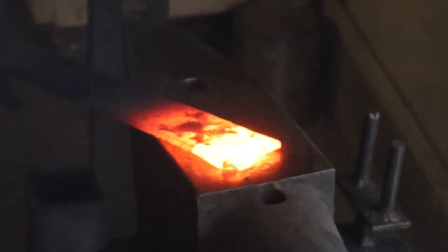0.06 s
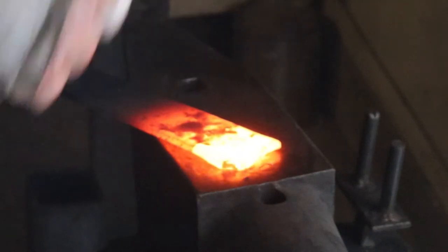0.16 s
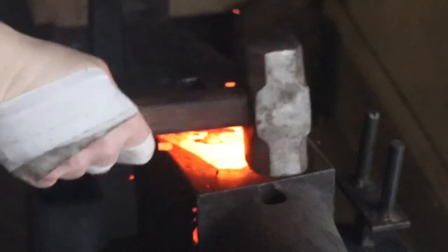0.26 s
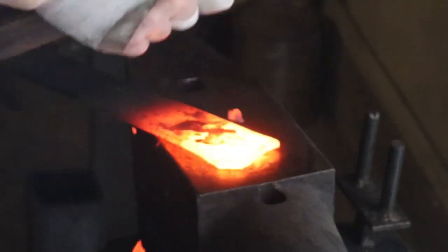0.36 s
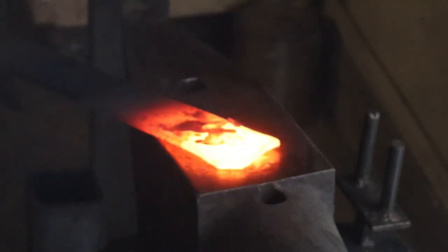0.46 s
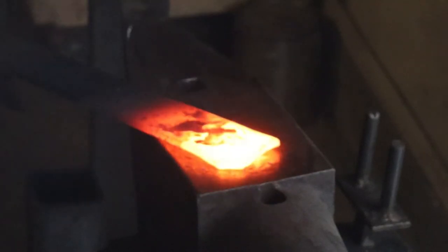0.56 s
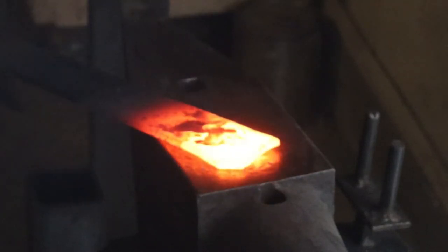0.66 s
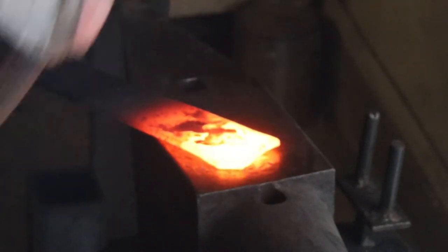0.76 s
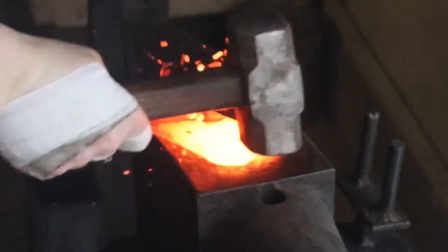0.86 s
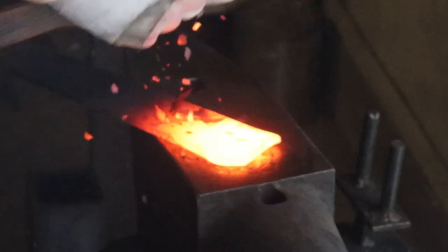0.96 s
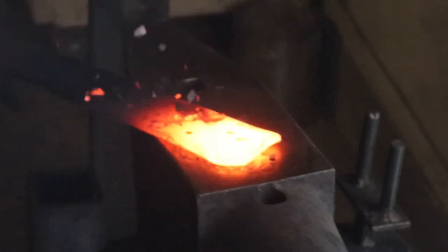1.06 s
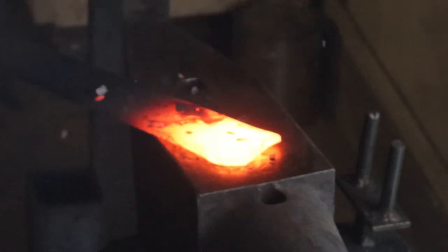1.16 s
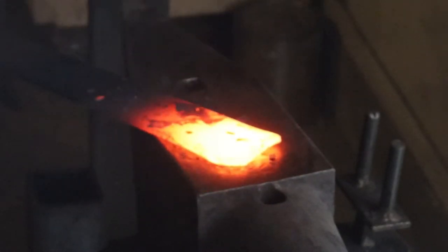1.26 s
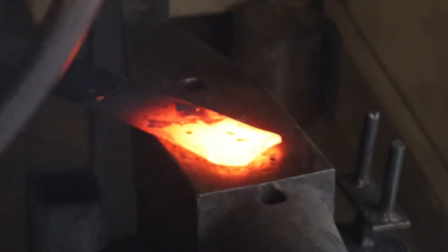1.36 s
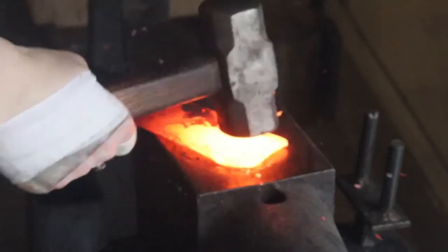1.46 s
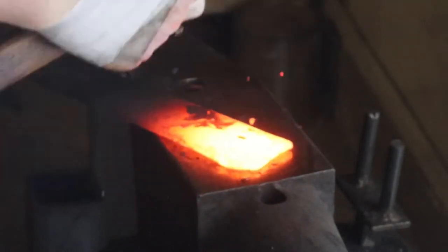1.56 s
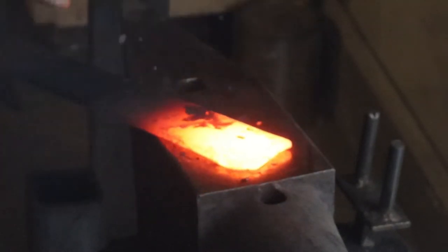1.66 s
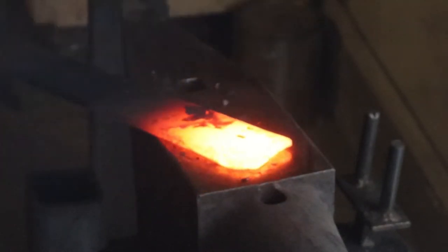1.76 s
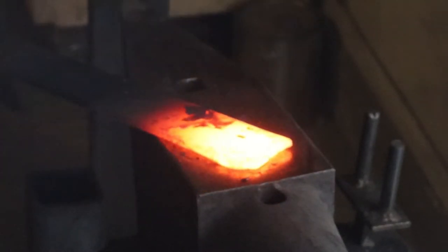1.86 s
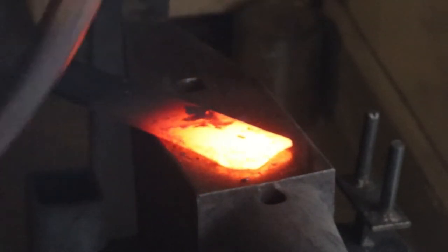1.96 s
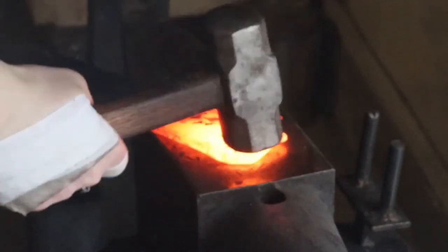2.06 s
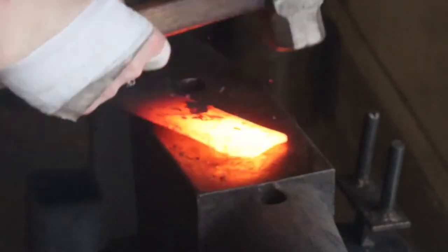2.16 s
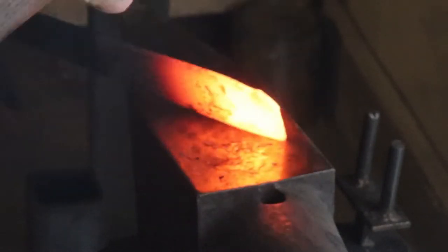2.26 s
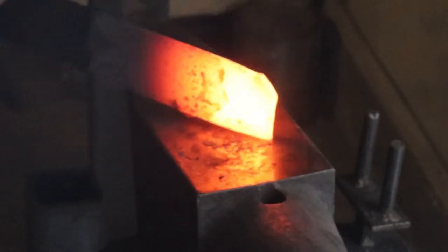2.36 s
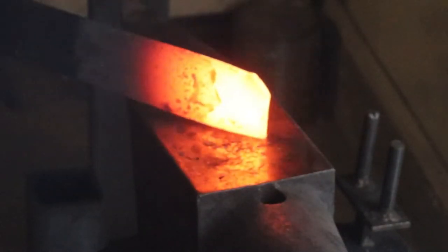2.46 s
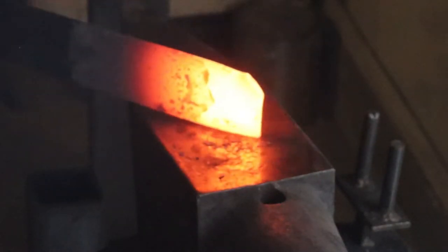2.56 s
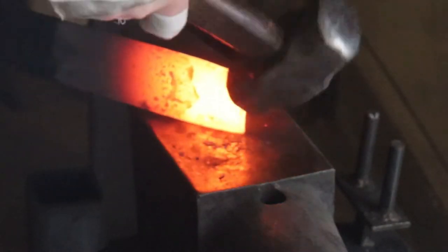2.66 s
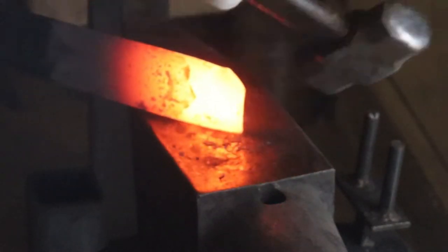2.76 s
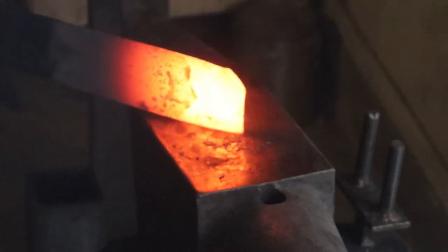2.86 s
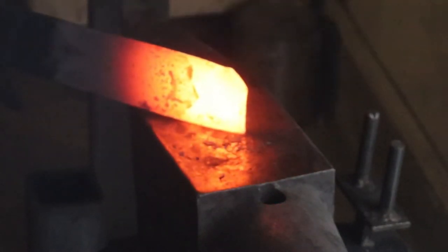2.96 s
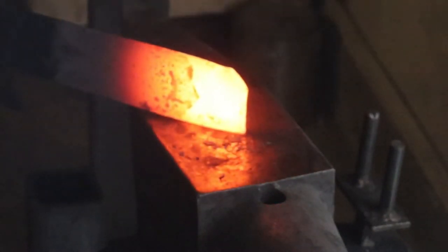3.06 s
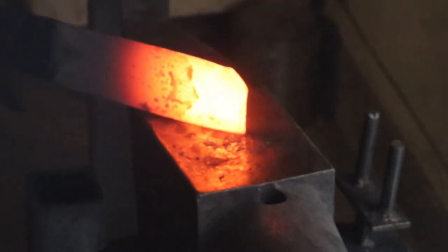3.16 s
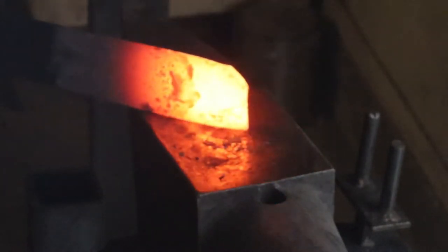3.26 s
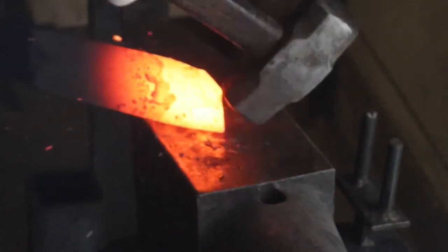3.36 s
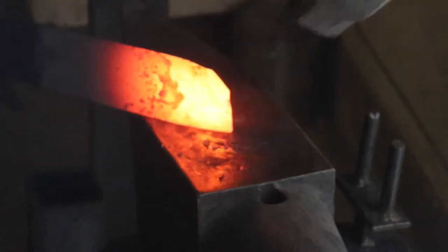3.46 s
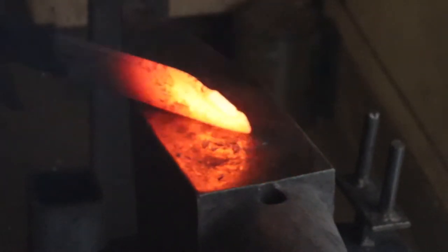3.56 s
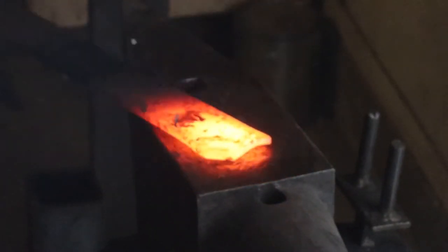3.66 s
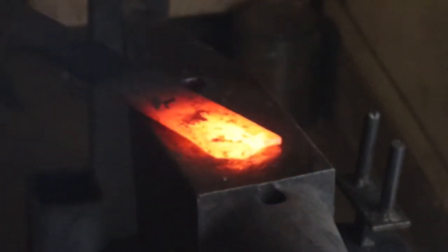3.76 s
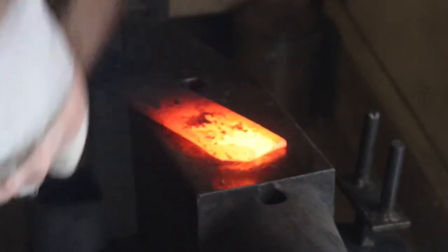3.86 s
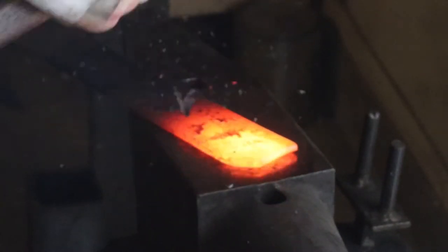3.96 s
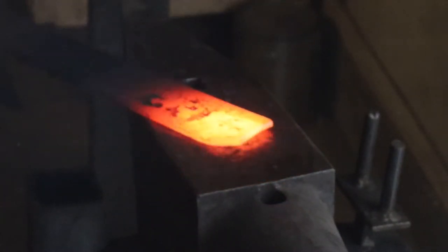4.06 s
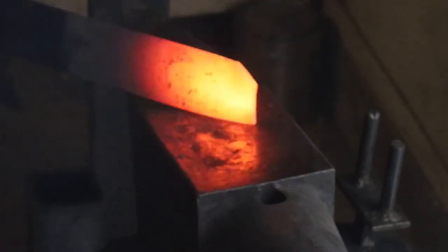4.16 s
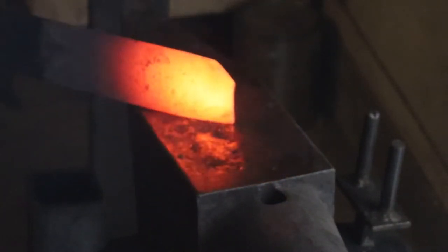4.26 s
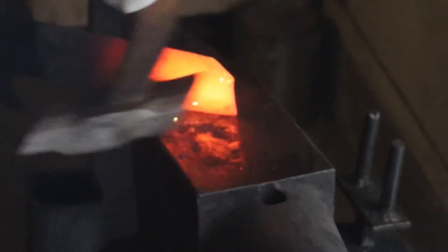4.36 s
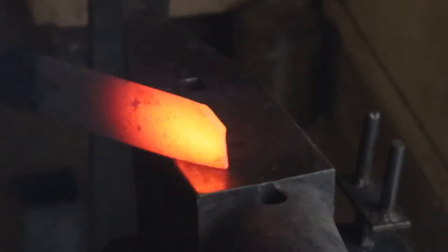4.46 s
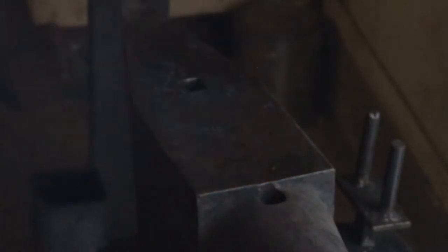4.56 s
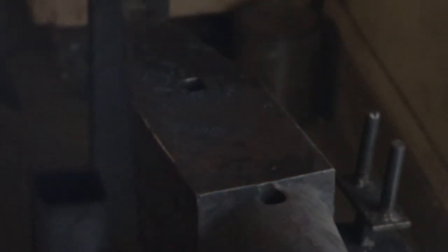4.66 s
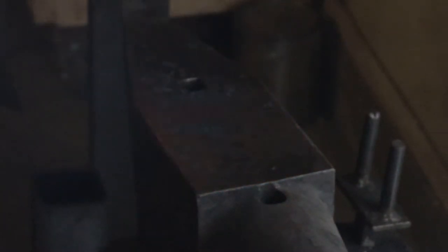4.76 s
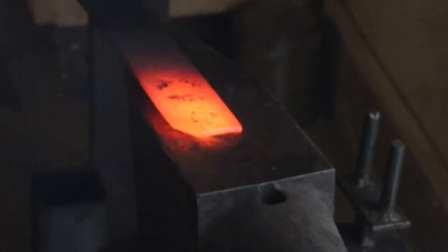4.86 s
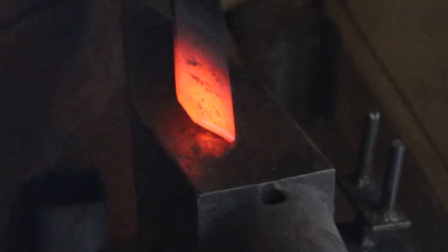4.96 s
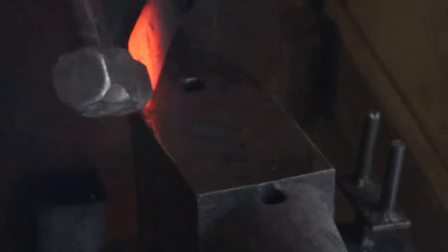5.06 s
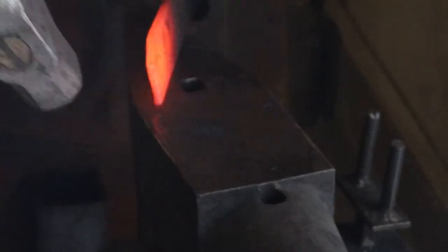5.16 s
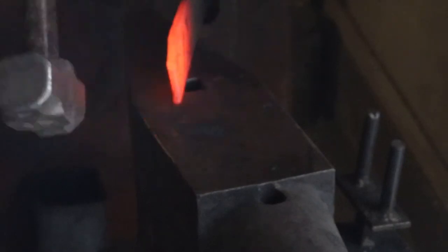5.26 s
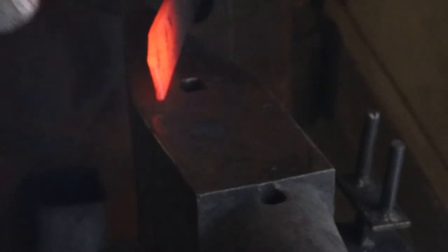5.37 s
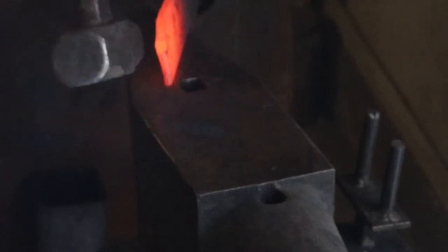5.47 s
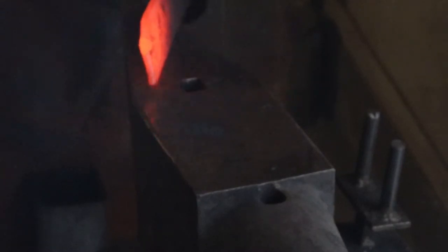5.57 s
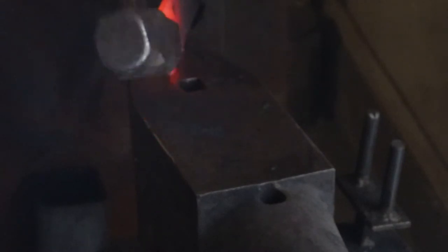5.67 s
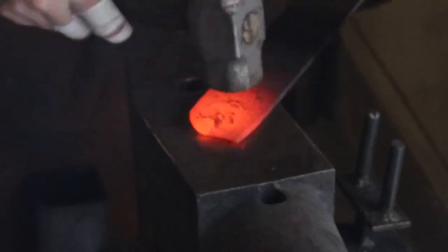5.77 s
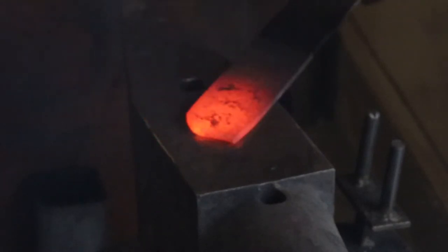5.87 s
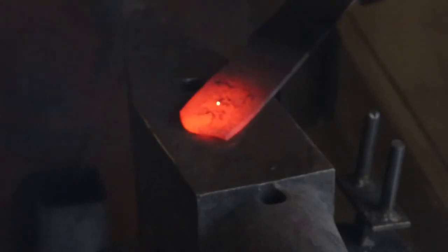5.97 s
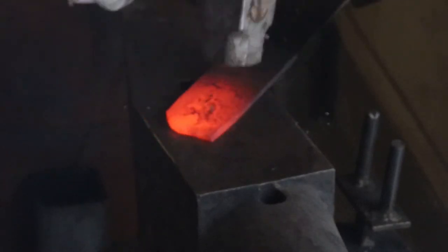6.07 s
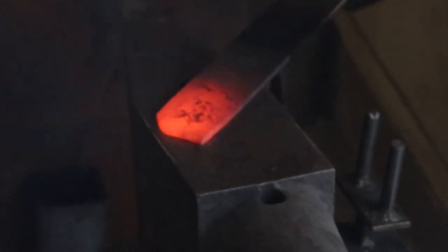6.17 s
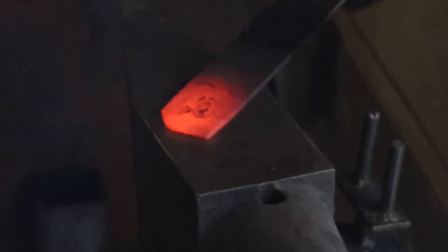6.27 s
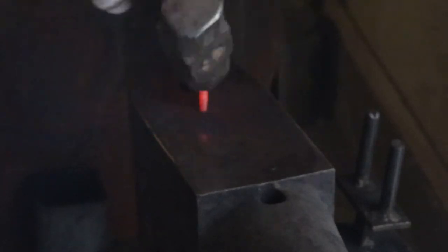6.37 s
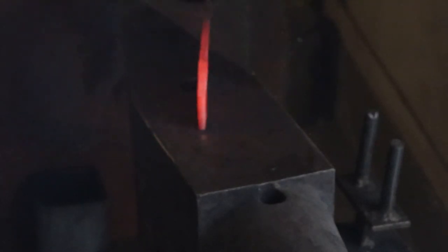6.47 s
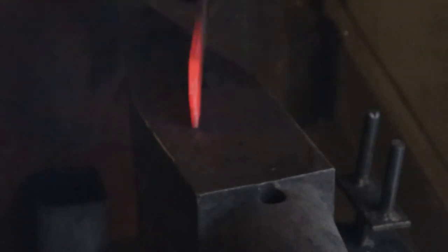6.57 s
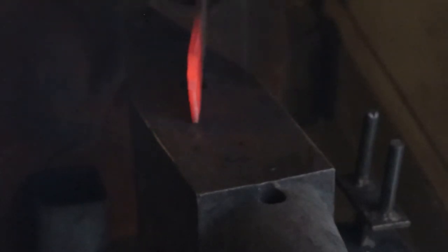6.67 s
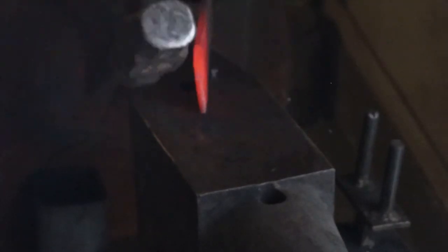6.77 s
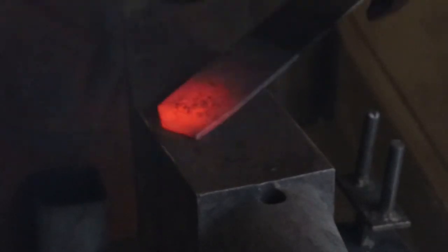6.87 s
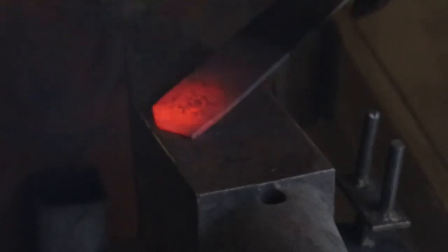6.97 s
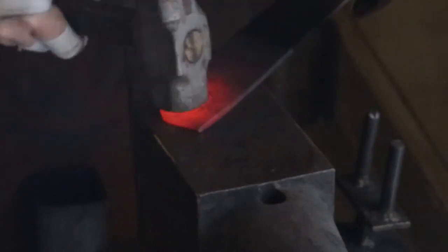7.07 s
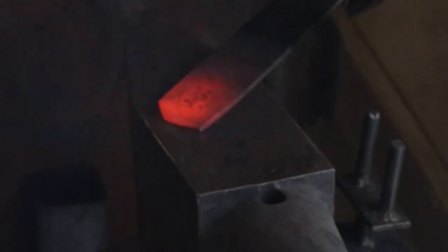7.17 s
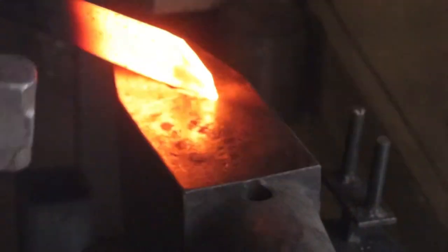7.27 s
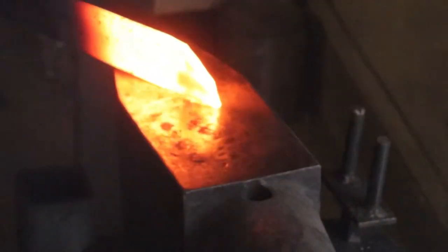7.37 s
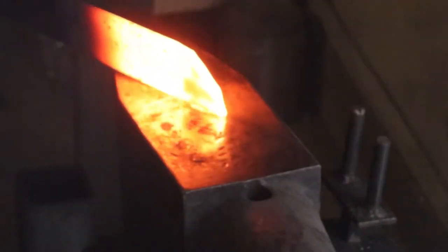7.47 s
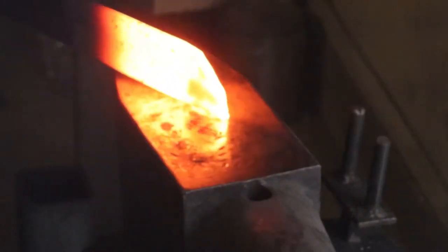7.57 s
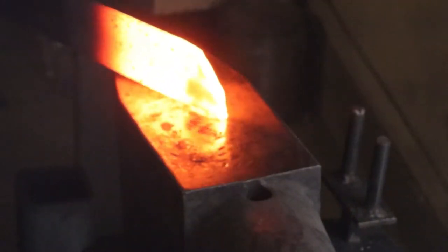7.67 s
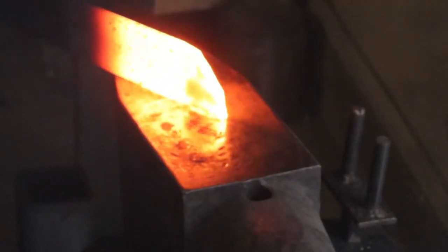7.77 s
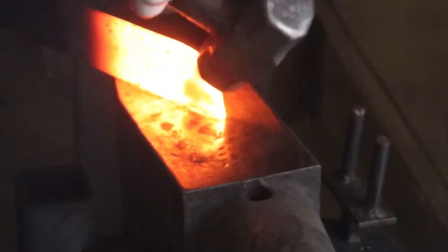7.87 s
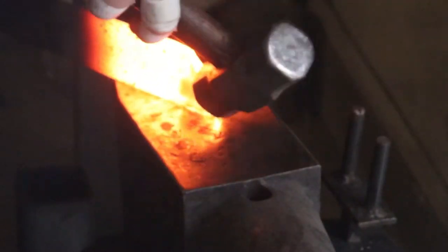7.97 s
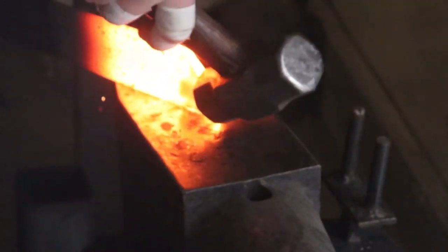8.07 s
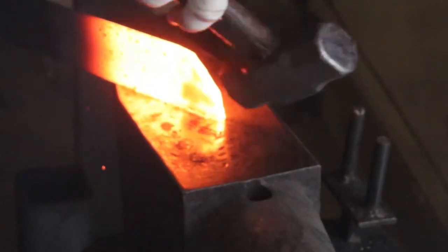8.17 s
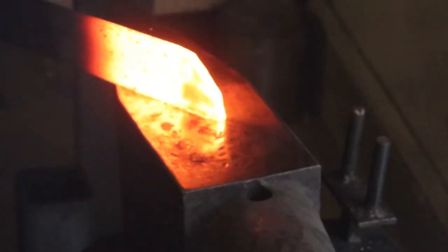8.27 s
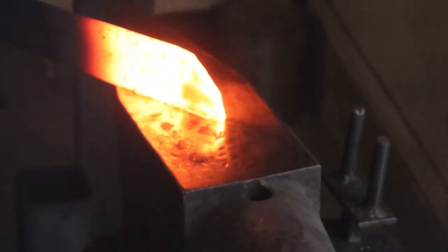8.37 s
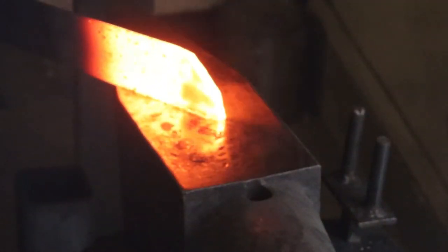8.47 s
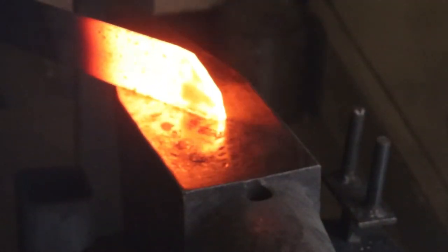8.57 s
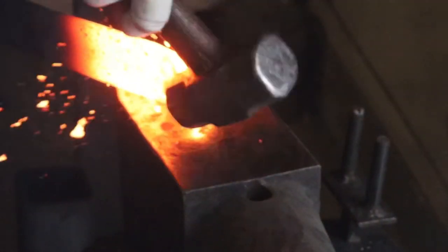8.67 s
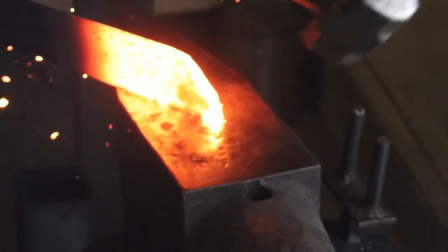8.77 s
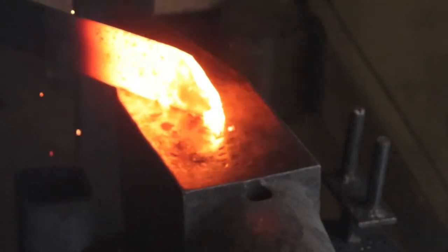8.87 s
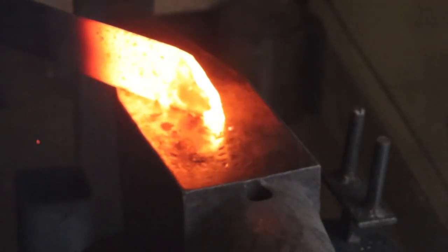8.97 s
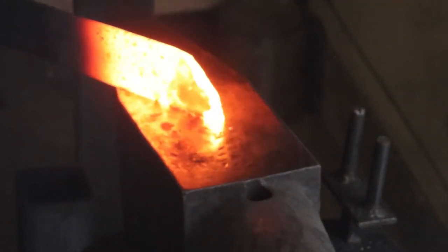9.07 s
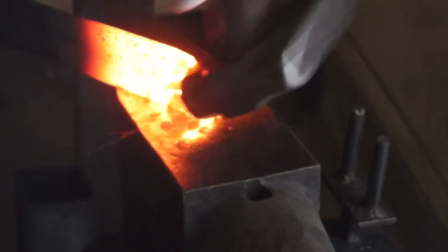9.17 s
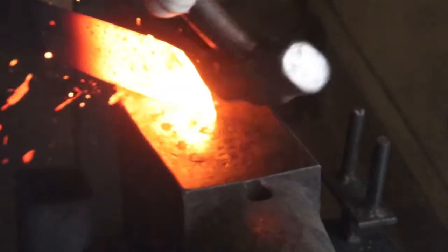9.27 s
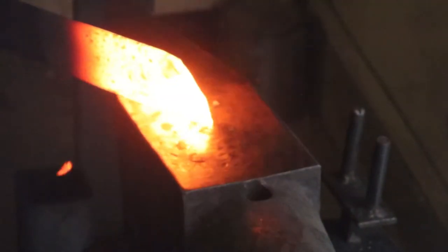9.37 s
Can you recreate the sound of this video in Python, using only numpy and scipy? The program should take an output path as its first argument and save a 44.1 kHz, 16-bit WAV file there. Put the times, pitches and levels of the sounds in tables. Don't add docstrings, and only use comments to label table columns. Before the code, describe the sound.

Steel is hammered on an anvil beside a roaring forge, rushes into fast chattering ticks, then returns to drags, taps and two strong blows.

```python
import sys
import numpy as np
from scipy import signal
from scipy.io import wavfile
from scipy.ndimage import uniform_filter1d, minimum_filter1d

SR = 44100
rng = np.random.default_rng(int(sys.argv[2]) if len(sys.argv) > 2 else 0)


def gain_from_decibels(decibels):
    exponent = np.asarray(decibels, float) / 20
    return 10 ** exponent


def unload_audio(sound):
    columns = np.transpose(np.atleast_2d(sound))
    steps = np.round(np.clip(columns, -1, 1) * 32767)
    wavfile.write(sys.argv[1], SR, steps.astype(np.int16))


N = 414981
BIN_HZ = np.fft.rfftfreq(1024, 1 / SR)[:, None]

# (start [s], end [s], playback speed [ratio])
SHOTS = [
    (0, 3.247, 1),
    (3.247, 4.7, 8),
    (4.7, 7.284, 8),
    (7.284, 9.42, 1),
]


def evened(x):
    return x / np.sqrt(np.mean(x ** 2) + 1e-20)


def read(points, hz):
    f, value = np.transpose(points)
    return np.interp(np.log(hz + 1), np.log(f + 1), value)


def add(mix, s, sound):
    part = mix[:, round(s * SR):][:, :sound.shape[-1]]
    part += sound[..., :part.shape[1]]


# (frequency [Hz], correlation [-1 to 1])
LIKENESS = [(60, 0.87), (180, 0.99), (550, 0.87), (1650, -0.26), (4970, -0.08), (15000, 0.16)]


def likeness(hz):
    return read(LIKENESS, hz)


def noise(tone, size, same=.8, patchy_db=0.):
    a, b, c, d, patches = rng.standard_normal((size // 256 + 5, 513, 5)).T
    patches = uniform_filter1d(patches, size=10, axis=0)
    patches = evened(uniform_filter1d(patches, size=10, axis=1))
    same = np.clip(same, -1, 1)
    left = a + 1j * b
    right = same * left + np.sqrt(1 - same ** 2) * (c + 1j * d)
    lift = 1 / np.sqrt((1 + same) / 2 + .01)
    shape = gain_from_decibels(read(tone, BIN_HZ) + patchy_db * patches) * lift * (BIN_HZ < 16000)
    out = signal.istft(np.array([left, right]) * shape, nperseg=1024, noverlap=768)[1][:, :size]
    return out / out.mean(0).std()


def add_curve(mix, points, tone, same, patchy_db):
    s, db = np.transpose(points)
    t = np.arange(s[0], s[-1], 1 / SR)
    size = SR // 2 * (int(2 * (s[-1] - s[0])) + 1)
    add(mix, s[0], gain_from_decibels(np.interp(t, s, db)) * noise(tone, size, same, patchy_db)[:, :len(t)])


# (frequency [Hz], density [dB per Hz])
ROAR = [(15, -48), (25, -14), (97, -18.5), (124, -13.5), (455, -0.5), (521, -7.5), (826, -5), (1280, -15),
        (1500, -12), (2320, -15), (6320, -26.5), (12100, -40), (16300, -47)]


def forge_roar(mix):
    add_curve(mix, [(s, -30) for s in SHOTS[0][:2]], ROAR, likeness(BIN_HZ), patchy_db=1.5)


def ring(modes, speed=1, spread_db=4.):
    hz, db, t60 = np.array(modes)[:, :3].T[:, :, None]
    t = np.arange(SR // (2 * speed)) / SR * speed
    luck = rng.standard_normal((3, len(modes), 1))
    apart = np.clip(luck[2], -1.3, 1.3) * np.minimum(hz * speed / 1500, 1)
    height = gain_from_decibels(db + spread_db * luck[0] - 60 * t / t60) * (hz * speed < SR / 2.5)
    ears = [height * np.sin(2 * np.pi * hz * t + luck[1] + side * apart) for side in (-.7, .7)]
    return np.array(ears).sum(1)


def crack(tone, t60, rise_ms=0.13, speed=1):
    t = np.arange(SR // 20) / SR
    same = np.maximum(likeness(BIN_HZ / speed), .55)
    rise = np.minimum(t * 1000 / max(rise_ms, .05), 1) ** 2
    return noise(tone, len(t), same) * gain_from_decibels(-60 * t / t60) * rise


# (frequency [Hz], t60 [s])
ROOM = [(100, 0.38), (400, 0.62), (1200, 0.57), (3000, 0.53), (6000, 0.51), (12000, 0.32)]


def echo(x, speed):
    frame = 256 // speed
    hz, t, z = signal.stft(rng.standard_normal((2, SR // speed)), SR, nperseg=frame)
    same = np.clip(likeness(hz / speed), .2, 1)[:, None]
    z[1] = same * z[0] + np.sqrt(1 - same ** 2) * z[1]
    decay = gain_from_decibels(-60 * t * speed / read(ROOM, hz / speed)[:, None])
    tail = signal.istft(z * decay, SR, nperseg=frame)[1]
    tail = tail * np.minimum(np.arange(tail.shape[1]) * speed / (0.017 * SR), 1)
    return signal.oaconvolve(x, tail / np.linalg.norm(tail[0]), axes=1)[:, :N]


# (time [s], strength [dB], face ring at 2.6 kHz [dB], heel ring at 5.3 kHz [dB],
# hammer head ring at 12 kHz [dB])
BLOWS = [
    (.312, 7, -4, -2, 6),
    (.919, 7, -4, 0, -16),
    (1.535, 7, -3, 0, 4),
    (2.137, 7, 2, 1, -5),
    (2.768, -1.5, -8, 19, -16),
    (8.006, -16, -8, -8, -30),
    (8.74, 2.5, -13, -6, -35),
    (9.286, 2.5, 15, 4, -35),
]
# (frequency [Hz], level [dB], t60 [s], part [0 body, 1 face, 2 heel, 3 head])
ANVIL = [(145, -6, .06, 0), (232, -6, .08, 0), (622, -4, .06, 0), (962, -6, .06, 0), (1216, -4, .06, 0),
         (1350, -4, .07, 0), (1500, -4, .07, 0), (1660, -6, .06, 0), (1850, -6, .06, 0),
         (2450, -11, .12, 0), (2572, -4, .22, 1), (3058, -2, .1, 0), (3750, -1, .17, 0), (3803, -2, .17, 0),
         (4493, -2, .13, 0), (5260, -15, .12, 2), (5330, -11, .14, 2), (6032, -4, .12, 0),
         (6790, -11, .08, 0), (7500, -14, .08, 0), (8450, -15, .08, 0), (12110, -24, .9, 3)]
# (frequency [Hz], density [dB per Hz])
CRACK = [(41, -35), (120, -11.5), (396, -8.5), (1300, 0.5), (2190, -3.5), (3020, -1), (4150, -3),
         (4450, -1), (4870, -2), (11300, -14), (16300, -31)]
# (frequency [Hz], level [dB], t60 [s])
BAR = [(232, -8, .3), (5130, -2, .14), (7150, -10, .1), (11300, -20, .1), (14000, -22, .08)]


def hammer(near, far):
    blows, sent = np.zeros((2, 2, N))
    echo_db = -5.5
    for s, db, *parts_db in BLOWS:
        hot_db = -5.0 * (s > SHOTS[3][0])
        offsets_db = [0, *parts_db]
        modes = []
        for hz, level, t60, part in ANVIL:
            offset_db = offsets_db[round(part)] if round(part) else hot_db * (hz > 2800)
            modes.append((hz, level + offset_db, t60))
        tone = [(hz, level + 0.22 * (db - 8.5) * max(np.log2(hz / 3500), 0) + 0.81 * hot_db * (hz > 2800))
                for hz, level in CRACK]
        blow = gain_from_decibels(-11.0) * ring(modes, spread_db=2.2)
        add(blow, 0, crack(tone, 0.096))
        add(blows, s, gain_from_decibels(db + 7.0) * blow)
        add(sent, s, gain_from_decibels(db + 10.5 + echo_db) * blow)
    bar = gain_from_decibels(-17) * ring(BAR, spread_db=3.2)
    add(blows, 8.006, bar)
    add(sent, 8.006, gain_from_decibels(echo_db) * bar)
    add(sent, 0, gain_from_decibels(-21.5) * crack(SCRAPE_TONE, 0.044))
    return near + blows + echo(far + sent, 1)


# (time [s], level [dB])
QUICK_DB = [(3.25, -32.5), (3.32, -29.5), (3.5, -31), (4.53, -31.5), (4.54, -44), (4.585, -39), (4.65, -32),
            (5.1, -30.5), (5.55, -29.5), (5.9, -32), (7.28, -30)]
# (frequency [Hz], density [dB per Hz])
QUICK_ROAR = [(30, -33), (150, -33.5), (250, -13), (700, -15.5), (1200, -10), (1750, -7.5), (2350, -0.5),
              (4000, -3), (6300, -5.5), (7700, -9), (14800, -10), (16300, -23)]


def quick_forge(mix):
    add_curve(mix, QUICK_DB, QUICK_ROAR, likeness(BIN_HZ / SHOTS[1][2]), patchy_db=2.0)


def hum():
    wobble = evened(uniform_filter1d(rng.standard_normal(N), size=4000))
    hz = 1211 * (1 + 0.00823 * wobble)
    return np.sqrt(2) * gain_from_decibels(-57.5) * np.sin(2 * np.pi * np.cumsum(hz) / SR)


# (time [s], strength [dB], thump [dB])
EDGE = [(3.2661, 0.5, -48), (3.3516, 5, -45.5), (3.4378, 1.5, -46), (3.5237, 8.5, -73), (3.6104, 1, -47.5),
        (4.274, 1, -55.5), (4.3588, -2.5, -28.5), (4.444, -10, -36), (5.1931, -3.5, -42),
        (5.2578, -6.5, -41.5), (5.321, -5, -36), (5.3895, -4.5, -39.5), (5.4581, -2, -35.5),
        (5.5274, -3.5, -35), (5.5983, -2.5, -49), (5.6699, -2, -30), (5.7449, 0.5, -49),
        (6.4471, -6.5, -42), (6.5241, -1, -28), (6.6007, 1.5, -39.5), (6.6787, 1.5, -29), (6.7571, -2, -35),
        (6.8349, 5.5, -47), (7.2819, -10, -41)]
# (time [s], strength [dB], thump [dB])
FLAT = [(3.7024, -6.5, -24), (3.7822, 2.5, -45), (3.8655, -4, -43), (3.9459, 1.5, -34),
        (4.0258, -1.5, -32.5), (4.1058, -1, -29), (4.1874, -1, -35), (5.9101, -1, -55.5),
        (5.9828, -2.5, -37), (6.0585, 1.5, -27), (6.1329, -1.5, -38.5), (6.2085, -1.5, -39),
        (6.2834, -2.5, -36), (6.3568, 1, -29), (6.9278, -7.5, -25.5), (7.0023, 0, -28), (7.071, 1.5, -38),
        (7.1403, 0, -39), (7.211, -4.5, -39)]
# (time [s], strength [dB], thump
# [dB])
TURNS = [
    (3.8348, -10, -47),
    (4.4688, -6.5, -56),
    (4.8784, -20.5, -49),
    (4.9601, -19, -49),
    (5.1307, -4.5, -55),
    (5.7878, -12, -50),
    (5.838, -10.5, -37),
]
# (frequency [Hz], density [dB per Hz])
QUICK_CRACK = [(180, -51.5), (400, -13), (680, -14.5), (1100, -4.5), (1800, -1.5), (2550, -11),
               (4430, -4.5), (5690, -3.5), (6290, -4.5), (10900, 0), (13100, -4), (14500, 4), (16300, -20)]
# (time [s], strength [dB], ring [dB])
CLATTER = [
    (4.5013, -1.5, -25.5),
    (4.516, 4.5, -34),
    (4.5337, 12.5, -15),
    (4.57, -23, -22.5),
    (4.578, -18, -20.5),
    (4.592, -1, -18.5),
    (4.607, -8, -9),
    (4.61, -6.5, -13),
    (4.667, -20.5, -17.5),
]
# (frequency [Hz], level [dB], t60 [s])
TOOL = [(4600, -24, .15), (8200, -5, .14), (11500, -5, .05), (14150, -3, .25), (15300, -3, .12)]
# (frequency [Hz], density [dB per Hz])
CLINK = [(1500, -17.5), (4000, -13.5), (6000, -10), (10000, -2.5), (15500, -2.5), (16500, -8.5)]


def quick_hammer():
    near, far = np.zeros((2, 2, N))
    push = signal.windows.hann(130)
    # (blows, echo [dB], left-right [dB], rise [ms])
    kinds = [(EDGE, -5.5, .3, 0.31), (FLAT, -9.5, 2.2, 1.01), (TURNS, -9, -1.1, 3.2)]
    for rows, echo_db, pan_db, rise_ms in kinds:
        pan = gain_from_decibels(np.array([[.5], [-.5]]) * pan_db)
        for s, db, thump_db in rows:
            blow = gain_from_decibels(-9.0) * ring(ANVIL, speed=8, spread_db=2.5)
            blow = blow * np.minimum(np.arange(blow.shape[1]) * 1000 / (max(rise_ms, .05) * SR), 1) ** 2
            add(blow, 0, crack(QUICK_CRACK, 0.031, rise_ms, speed=4.3))
            later_db = 4.5 * (s > SHOTS[2][0])
            add(far, s, gain_from_decibels(db + 4.0 + echo_db + later_db) * blow)
            add(near, s, gain_from_decibels(db - 3.54) * blow * pan)
            lopsided = 1 + 0.67 * rng.choice([-1, 1]) * np.array([[1], [-1]])
            add(near, s, gain_from_decibels(db + thump_db + 6.5) * lopsided * push)
    for s, db, ring_db in CLATTER:
        clink = gain_from_decibels(ring_db) * ring(TOOL, spread_db=3.0)
        add(clink, 0, crack(CLINK, 0.028, speed=8))
        add(far, s, gain_from_decibels(db - 8.5) * clink)
        add(near, s, gain_from_decibels(db - 4.5) * clink)
        add(near, s, gain_from_decibels(3.6 * db - 61.5) * push)
    return near + gain_from_decibels(2.0) * echo(far, 8)


def squeak(length, start_hz, end_hz, db):
    size = int(length * SR)
    wobble = evened(uniform_filter1d(rng.standard_normal(SR // 10), size=60))[:size]
    turns = 2 * np.pi * np.cumsum(np.linspace(start_hz, end_hz, size) * (1 + 0.018 * wobble)) / SR
    wave = np.sin(turns) + 0.094 * np.sin(2 * turns)
    return gain_from_decibels(db) * wave * signal.windows.tukey(size, .4) * np.ones((2, 1))


# (time [s], length [s], start [Hz], end [Hz], level [dB])
SQUEAKS = [
    (3.595, 0.015, 5700, 5900, -23),
    (3.652, .016, 6500, 6840, -27),
    (3.735, 0.07, 6700, 7200, -27),
    (3.742, 0.02, 7250, 7200, -27),
    (3.753, 0.018, 8750, 9270, -30),
    (3.822, 0.032, 6630, 6700, -19),
    (4.41, 0.024, 12400, 12500, -32),
    (4.54, 0.05, 4050, 4500, -24.5),
    (4.595, .05, 4490, 4610, -22.5),
    (7.38, 0.042, 2153, 1854, -9),
]
# (peak time [s], rise [s], fall [s], peak level [dB])
SCRAPE = [
    (7.382, 0.05, 0.48, -30),
    (7.505, .02, 0.34, -30),
    (7.57, .2, 0.26, -31.5),
    (7.899, 0.012, .15, -35.5),
    (7.938, 0.091, 0.17, -37.5),
    (8.445, .015, 0.066, -47),
    (8.474, .015, .035, -44),
]
# (frequency [Hz], density [dB per Hz])
SCRAPE_TONE = [(300, -28), (900, -9), (2500, -2), (4200, -2.5), (6800, -12), (9000, -20), (16000, -34.5)]
# (time [s], level [dB])
TICKS = [
    (7.3592, -22),
    (7.872, -51),
    (7.895, -31),
    (7.9419, -15.5),
    (8.4372, -30),
    (8.5688, -33),
    (9.215, -33.5),
    (9.2214, -39),
]


def handling():
    scrapes, dry = np.zeros((2, 2, N))
    silent_db = -69.5
    for s, rise, fall, db in SCRAPE:
        stroke = [(s - rise, silent_db), (s, db), (s + fall, silent_db)]
        add_curve(scrapes, stroke, SCRAPE_TONE, .4, patchy_db=1.1)
    for s, db in TICKS:
        add(dry, s, gain_from_decibels(db - 8.0) * crack(SCRAPE_TONE, 0.015))
    for s, *shape in SQUEAKS:
        add(dry, s, squeak(*shape))
    return gain_from_decibels(1.0) * scrapes + dry, gain_from_decibels(2.0) * dry


# (frequency [Hz], density [dB per Hz])
QUIET = [(25, -6.5), (100, -5), (160, -3), (240, -1), (450, -5.5), (640, -9), (850, -12), (2000, -16.5),
         (4000, -21.5), (7000, -26), (11000, -31.5), (16300, -39)]


def quiet_shop(mix):
    add_curve(mix, [(s, -45.5) for s in SHOTS[3][:2]], QUIET, likeness(BIN_HZ), patchy_db=-0.3)


def scene():
    t = np.arange(N) / SR
    fast = (t >= SHOTS[1][0]) & (t < SHOTS[2][1])
    near, far = handling()
    out = np.where(fast, near + quick_hammer() + hum(), hammer(near, far * ~fast))
    forge_roar(out)
    quick_forge(out)
    quiet_shop(out)
    return out


def levelled(x, speed, hold_db, lag_s=0.0096, share=0.87):
    size = 320 // speed
    peak = -minimum_filter1d(-abs(x).max(0), size, origin=size // 2 - 1)
    cut_db = share * np.maximum(20 * np.log10(peak + 1e-9) - hold_db, 0)
    r = np.exp(-speed / (lag_s * SR))
    for stage in range(2):
        cut_db = signal.lfilter([1 - r], [1, -r], cut_db)
    return np.clip(x / gain_from_decibels(cut_db), -1, 1)


HOLD_DB = (-11.5, -16.5, -21, -11)


def gain_control(dry):
    parts = [levelled(dry[:, round(start * SR):round(end * SR)], speed, hold_db)
             for (start, end, speed), hold_db in zip(SHOTS, HOLD_DB)]
    return np.hstack(parts)


def band_limit(x):
    return signal.sosfilt(signal.butter(12, 16470, fs=SR, output="sos"), x)


def record(dry):
    mix = gain_control(dry)
    return band_limit(mix)


dry = scene()
out = record(dry)
unload_audio(out)
```